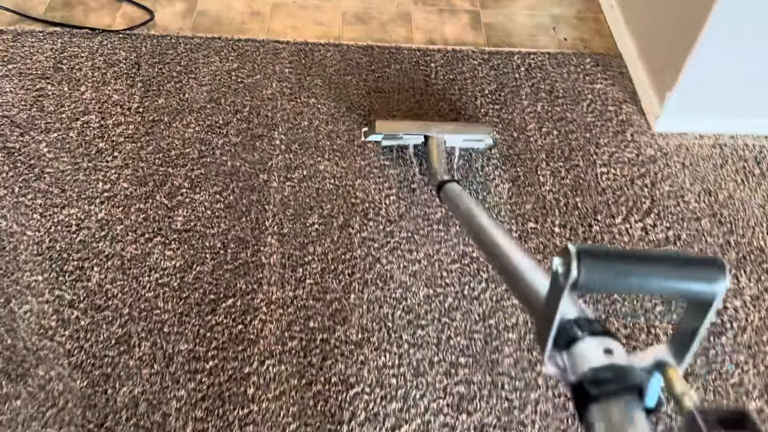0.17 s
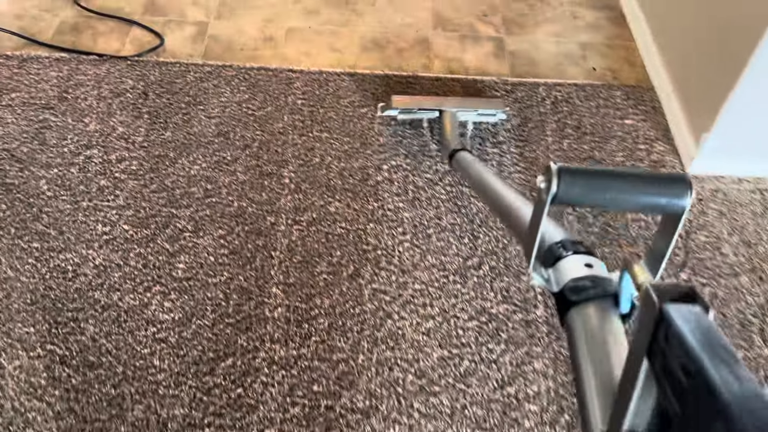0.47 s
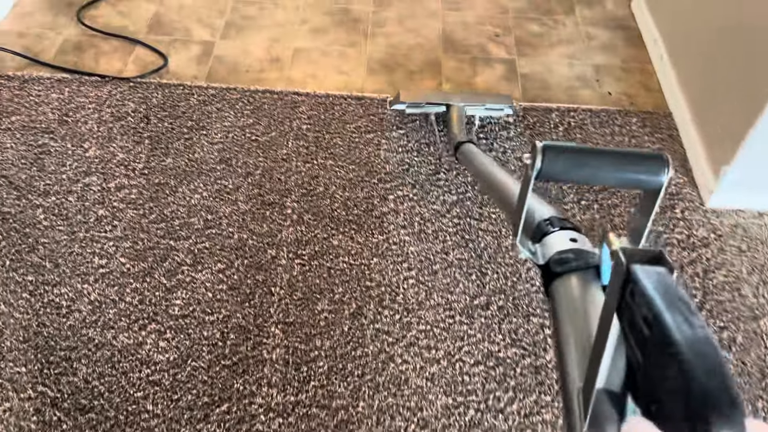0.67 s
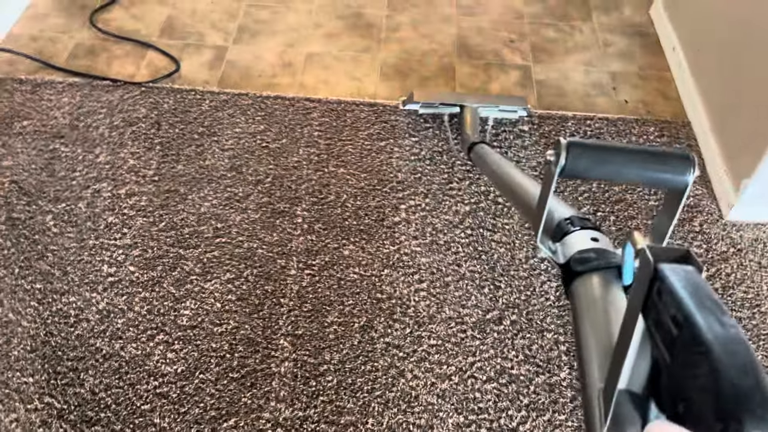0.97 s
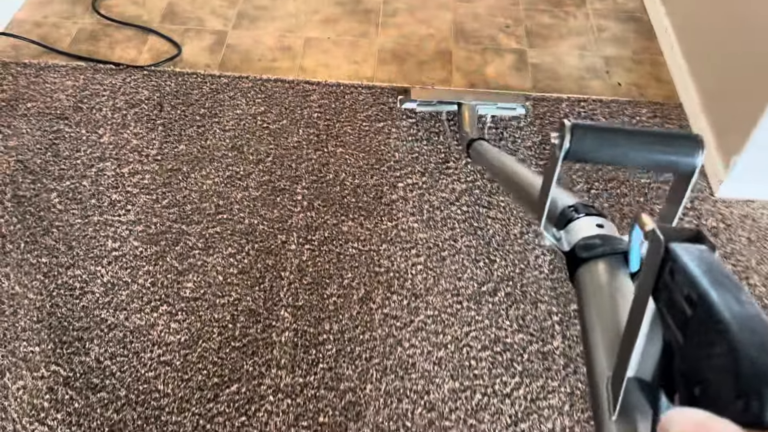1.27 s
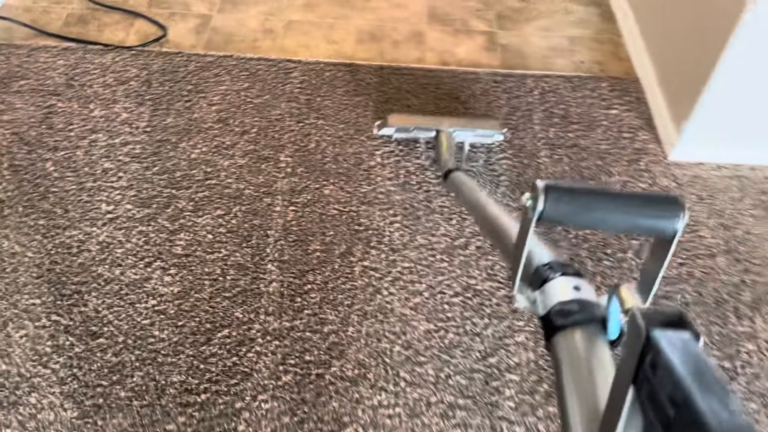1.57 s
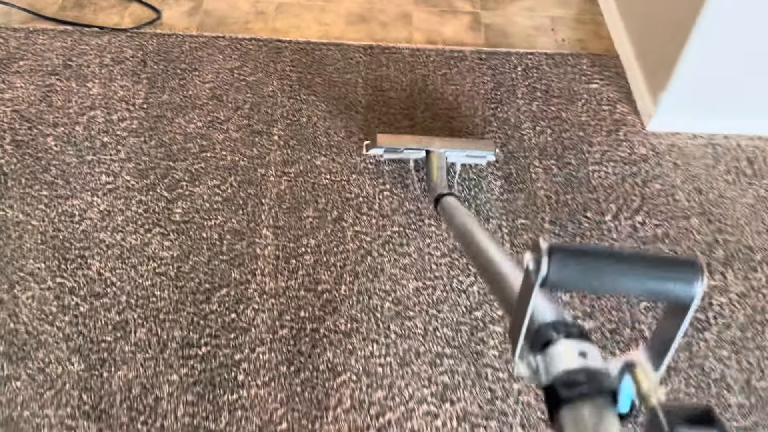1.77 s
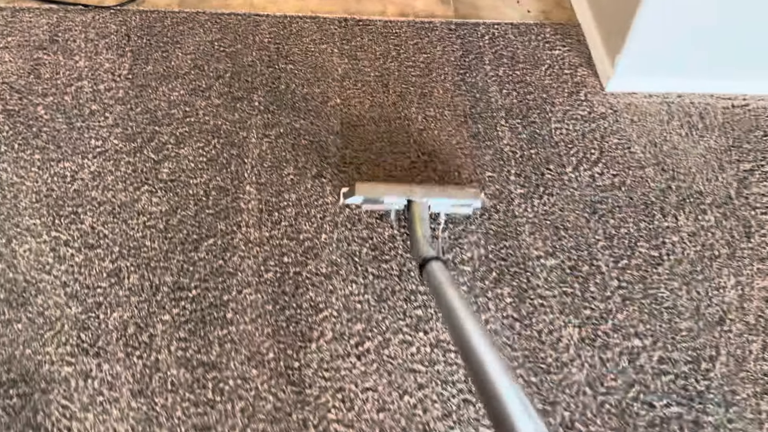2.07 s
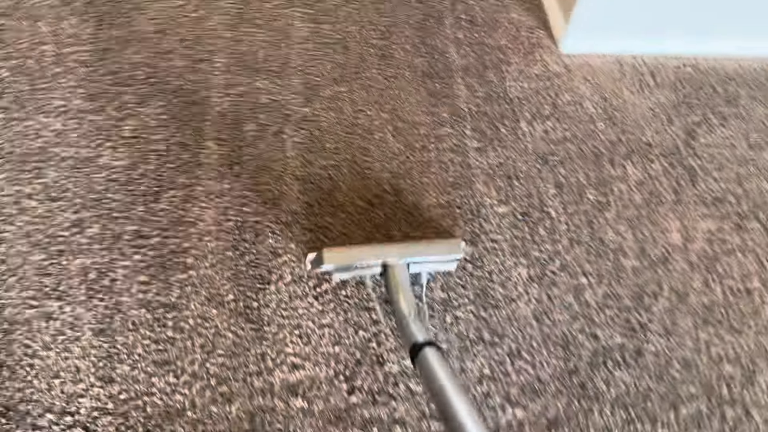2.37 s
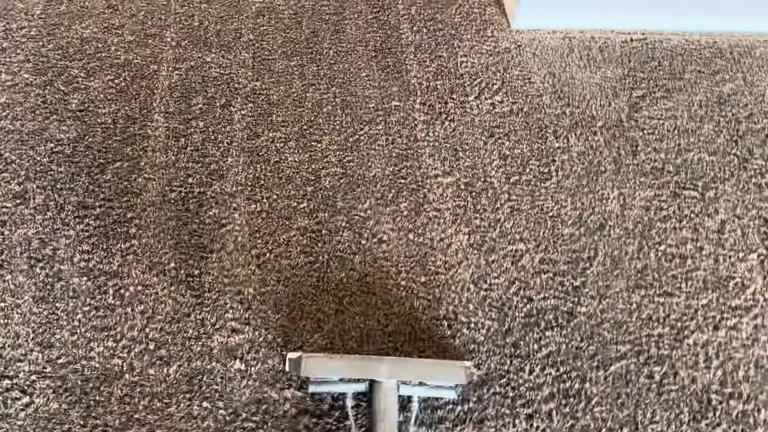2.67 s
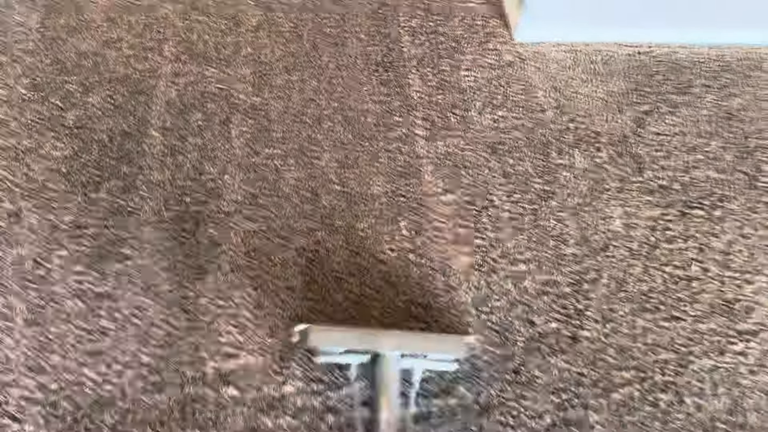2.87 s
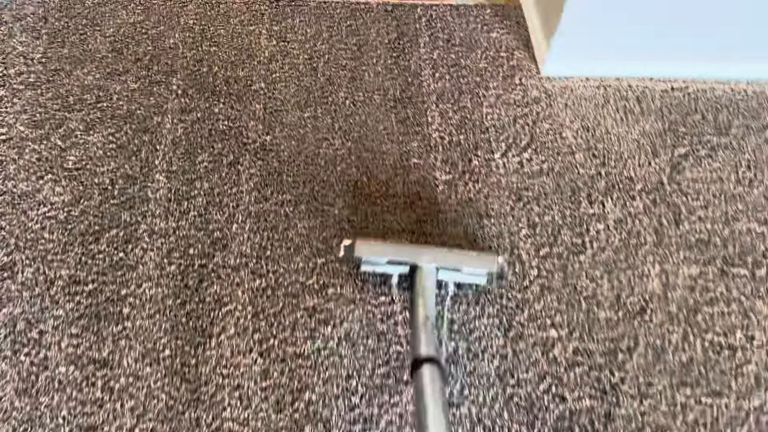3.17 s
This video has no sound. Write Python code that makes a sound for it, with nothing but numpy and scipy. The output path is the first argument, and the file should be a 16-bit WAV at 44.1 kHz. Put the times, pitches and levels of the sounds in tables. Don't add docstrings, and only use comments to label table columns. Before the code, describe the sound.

A carpet cleaning wand makes dense, bright water-jet hiss throughout, over soft low scrubbing, leaking air and faint hose hum. It pushes outward until a scuff and deep, dull thud at 0.75 s, briefly rattling; the air rush dips. A faint scuff at 1.1 s starts the pull back, scrubbing and rush swelling until 2.6 s. A brief dip, a rough turning scuff at 2.75 s, then hissing, scrubbing push to 3.3 s. Close, dry room, stereo phone.

```python
import sys
import numpy as np
from scipy import signal
from scipy.io import wavfile
from scipy.ndimage import uniform_filter1d

SR = 44100
rng = np.random.default_rng(int(sys.argv[2]) if len(sys.argv) > 2 else 0)


def convert_level_to_amplitude(level_db):
    exponent = np.asarray(level_db, float) / 20
    return 10 ** exponent


def to_wav(sig):
    pcm = np.clip(np.atleast_2d(sig), -1, 1) * 32767
    pcm = np.round(pcm).astype(np.int16)
    wavfile.write(sys.argv[1], SR, pcm.T)


N = 146853

# time_s, level_db
HAND_RUMBLE = [(0, -50), (.5, -43), (.6, -63), (1.0, -62), (2.1, -59), (2.75, -62), (2.88, -44),
               (3.33, -50)]
# time_s, level_db, opening_0_to_1
JETS = [(0, -16.5, .1), (.35, -16.5, .1), (.6, -19, 0.13), (1.17, -17.5, 0.1), (1.21, -21, 0.24),
        (1.25, -17.5, 0.08), (2.0, -19.5, 0.55), (2.45, -16, .3), (2.7, -17.5, 0.34), (2.8, -18, 0.37),
        (2.86, -19.5, 0.78), (3.33, -16.5, 0.4)]
# pitch_hz, level_db_per_hz
HISS_COLOUR = [(1500, -34), (5000, -10), (8000, -10), (9500, 2), (11000, 0.5), (13000, 1.5), (14800, 6.5),
               (15600, -1.5)]
# pitch_hz, width_hz, level_db
SLOT_RESONANCES = [(6960, 920, 20.5), (9380, 170, 20), (11100, 370, 12.5), (14500, 800, 3),
                   (16040, 160, 38)]
# time_s, level_db
SEAL_LEAK = [(0, -28.5), (.35, -29), (.6, -28.5), (.72, -28), (.79, -35), (1.15, -35.5), (1.3, -30),
             (1.55, -27), (1.83, -24.5), (2.1, -25), (2.5, -24.5), (2.55, -23.5), (2.6, -17.5), (2.67, -20),
             (2.7, -28.5), (2.8, -28.5), (2.87, -30.5), (3.33, -29)]
# pitch_hz, level_db_per_hz
GAP_COLOUR = [(300, -19.5), (1500, -9.5), (2300, -1), (3600, 1.5), (5000, -5), (7000, -10), (9000, -6),
              (16000, -60)]
# pitch_hz, width_hz, level_db
LIP_RESONANCES = [(2220, 240, 2.5), (3300, 280, -1)]
# start_s, rise_s, fade_60_db_s, level_db
SCUFFS = [
    (0.713, 0.032, 0.28, -23),
    (1.109, 0.013, 0.38, -29),
    (2.75, 0.03, 0.32, -20),
]
# pitch_hz, level_db_per_hz
SCUFF_COLOUR = [(100, -3), (400, -2), (1300, -3), (2500, -12), (6000, -23)]
# pitch_hz, level_db, time_to_peak_s, pitch_drop_hz
BUMP_MODES = [(76, -11, 0.0096, 140), (164, -16.5, .007, 5), (46, -31, 0.057, 1), (106.8, -25.5, 0.042, 1),
              (270.4, -28.5, 0.016, 1), (395, -29, 0.015, 1)]
# time_s, level_db
STROKE = [(0, -33), (.3, -30.5), (.6, -33), (.72, -32.5), (.84, -33.5), (1.17, -37.5), (1.21, -30),
          (1.5, -28), (1.9, -25.5), (2.3, -24), (2.46, -23), (2.55, -26), (2.63, -28.5), (2.66, -39),
          (2.76, -28.5), (2.86, -33), (3.1, -27), (3.33, -28)]
# pitch_hz, level_db_per_hz
SCRUB_COLOUR = [(40, -31), (90, -6.5), (260, -2.5), (500, -6), (1200, -5.5), (2000, -14), (4000, -29.5),
                (9000, -42)]
# pitch_hz, width_hz, level_db
TUBE_RESONANCES = [(103.5, 5.3, 10), (165, 7.7, 5.5), (270.8, 16.4, 5.5), (2320, 30, -6)]
# pitch_hz, likeness_0_to_1
PORT_LIKENESS = [(100, .997), (250, .955), (700, .64), (1400, .72), (2800, .5), (5500, .42), (7200, .86),
                 (9000, .985)]
# pitch_hz, left_minus_right_db
PORT_LEAN = [(200, .2), (900, 2), (1900, 2.4), (2900, -2.5), (4000, -.5), (6000, -.5), (8000, -.5),
             (9000, 0)]
# pitch_hz, lead_radians
PORT_TURN = [(1500, -.1), (2400, 1.0), (6000, .5), (7300, -.05), (8950, -3.14), (11300, -6.28),
             (13400, -9.42), (15750, -12.56)]
# time_s, phase_lingering,
# stray_share_0_to_1
PORT_CHANGES = [(0, .55, .3), (.33, .55, .25), (.38, .65, .03), (1.45, .65, .03), (1.6, .95, .06), (2.2, 1.0, .07),
                (2.6, 1.05, .02), (3.15, 1.1, .02), (3.33, 1.1, .15)]

BUMP_S = .7455


def evened(x):
    return x / np.sqrt(np.mean(x ** 2) + 1e-20)


def read(points, hz):
    f, value = np.transpose(points)
    return np.interp(np.log(hz + 1), np.log(f + 1), value)


def track(table, column, t):
    rows = np.array(table)
    return np.interp(t, rows[:, 0], rows[:, column])


def slow(t, top_hz):
    rates = np.geomspace(top_hz / 4, top_hz, 24)
    return evened(sum(np.sin(2 * np.pi * (f * t + rng.random())) / np.sqrt(f) for f in rates))


def humps(table, hz):
    return sum(db * np.exp(-.5 * ((hz - f) / width) ** 2) for f, width, db in table)


def fuzzy(t, hz, width):
    r = np.exp(-np.pi * width / SR)
    z = rng.standard_normal(N) + 1j * rng.standard_normal(N)
    wander = signal.lfilter([1], np.convolve([1, -r], [1, -r]), z)
    return evened((wander * np.exp(2j * np.pi * hz * t)).real)


def port_likeness(hz, t):
    stray = track(PORT_CHANGES, 2, t) * np.exp(-.5 * ((hz - 8800) / 900) ** 2)
    return np.clip(read(PORT_LIKENESS, hz) - stray, 0, 1)


def port_turn(hz, t):
    f, lead = np.transpose(PORT_TURN)
    in_step = np.minimum(hz / 900, 1)
    turn = np.interp(hz, f, lead) * in_step + .05 * slow(t, 6.0) * hz / 1e4
    return turn - track(PORT_CHANGES, 1, t) * np.sin(2 * turn) / 2


def air(colour, patchy_db, flicker_db, flicker_hz, size=512):
    hop = size // 4
    frames = N // hop + 5
    hz = np.fft.rfftfreq(size, 1 / SR)[:, None]
    t = np.arange(frames) * hop / SR
    a, b, c, d, patches = rng.standard_normal((frames, len(hz), 5)).T
    patches = uniform_filter1d(patches, size // 80, 0)
    patches = evened(uniform_filter1d(patches, 2048 // hop, 1))
    same = port_likeness(hz, t)
    left = a + 1j * b
    right = same * left + np.sqrt(1 - same ** 2) * (c + 1j * d)
    right = right * np.exp(1j * port_turn(hz, t))
    lean = convert_level_to_amplitude(read(PORT_LEAN, hz) / 2)
    gain = convert_level_to_amplitude(colour(hz, t) + patchy_db * patches + flicker_db * slow(t, flicker_hz))
    spectra = np.array([left * lean, right / lean]) * gain
    return evened(signal.istft(spectra, nperseg=size, noverlap=size - hop)[1][:, :N])


def walls(x):
    first_s, last_s = .003, .045
    draw = rng.random((16, 2))
    late = draw[:, 0]
    places = (SR * (first_s + (last_s - first_s) * late)).astype(int)
    taps = np.zeros(round(last_s * SR) + 1)
    taps[places] = np.sign(draw[:, 1] - .5) * convert_level_to_amplitude(-24 - 6 * late)
    taps[0] = 1
    return signal.oaconvolve(x, taps[None] / np.linalg.norm(taps))[:, :N]


def hose(t):
    hum_hz = 67.1
    wavering_hz = hum_hz * (1 + 0.021 * slow(t, 4.01))
    tone = np.sqrt(2) * np.sin(2 * np.pi * np.cumsum(wavering_hz) / SR)
    throb = convert_level_to_amplitude(-42) * fuzzy(t, hum_hz, 21)
    rumble = convert_level_to_amplitude(2 + track(HAND_RUMBLE, 1, t)) * fuzzy(t, 42, 5.3)
    return throb + convert_level_to_amplitude(-41.5) * tone + rumble


def jets(t):
    def colour(hz, u):
        return read(HISS_COLOUR, hz) + humps(SLOT_RESONANCES, hz) * track(JETS, 2, u)

    hiss = air(colour, patchy_db=1.4, flicker_db=0.0, flicker_hz=27.0)
    return hiss * convert_level_to_amplitude(track(JETS, 1, t))


def gap(t):
    def colour(hz, u):
        return read(GAP_COLOUR, hz) + humps(LIP_RESONANCES, hz)

    rush = air(colour, patchy_db=1.48, flicker_db=0.12, flicker_hz=41.1)
    return rush * convert_level_to_amplitude(track(SEAL_LEAK, 1, t))


def scuffs(t):
    shape = 0
    for start, rise, t60, db in SCUFFS:
        swell = np.clip((t - start) / rise, 0, 1)
        fade_db = 60 * np.maximum(t - start - rise, 0) / t60
        shape = shape + swell * convert_level_to_amplitude(db - fade_db)
    rub = air(lambda hz, u: read(SCUFF_COLOUR, hz), patchy_db=1.5, flicker_db=-1.5, flicker_hz=120.8)
    return shape * rub


def shudder(t):
    u = np.maximum(t - BUMP_S, 0) / 0.036
    return convert_level_to_amplitude(-24.5) * u * np.exp(1 - u) * fuzzy(t, 100, 190)


def bump(t):
    drop_s = 0.0026
    u = np.maximum(t - BUMP_S, 0)
    thud = 0
    for hz, db, peak, drop in BUMP_MODES:
        swell = u / peak * np.exp(1 - u / peak)
        cycles = hz * u + drop * drop_s * (1 - np.exp(-u / drop_s))
        thud = thud + convert_level_to_amplitude(db) * swell * np.sin(2 * np.pi * cycles)
    return -thud


def scrub(t):
    def colour(hz, u):
        return read(SCRUB_COLOUR, hz) + humps(TUBE_RESONANCES, hz)

    body = air(colour, patchy_db=0.5, flicker_db=-0.4, flicker_hz=4.5, size=4096)
    return body * convert_level_to_amplitude(track(STROKE, 1, t) + 1.29 * slow(t, 60.0))


def scene():
    t = np.arange(N) / SR
    airy = jets(t) + gap(t) + scuffs(t) + scrub(t)
    return hose(t) + walls(airy) + shudder(t) + bump(t)


def band_limit(x):
    return signal.sosfilt(signal.butter(12, 17100, fs=SR, output="sos"), x)


def record(dry):
    low_cut = signal.butter(4, 37, "high", fs=SR, output="sos")
    edge = signal.firwin(1501, 15820, window=("kaiser", 9), fs=SR)
    cut = signal.sosfilt(low_cut, dry)
    return band_limit(signal.oaconvolve(cut, edge[None], "same"))


dry = scene()
out = record(dry)
to_wav(out)
```